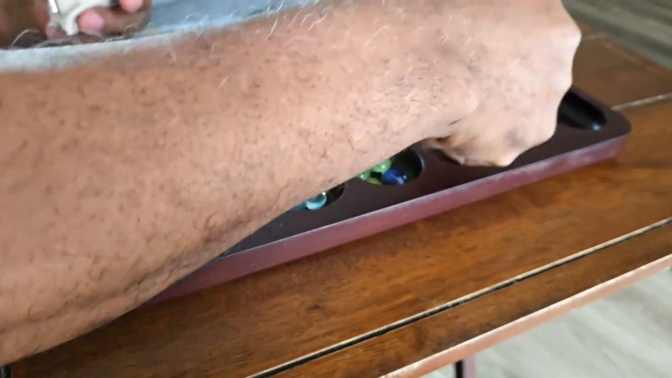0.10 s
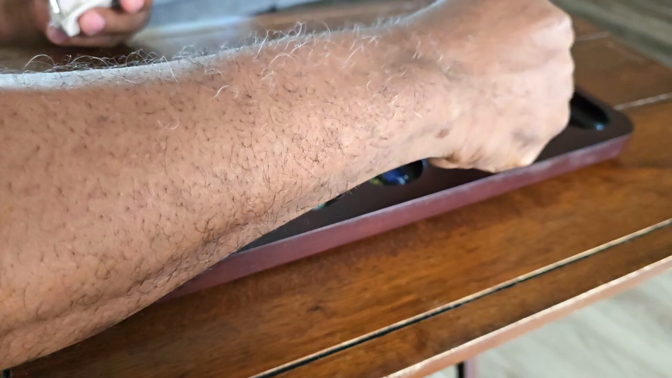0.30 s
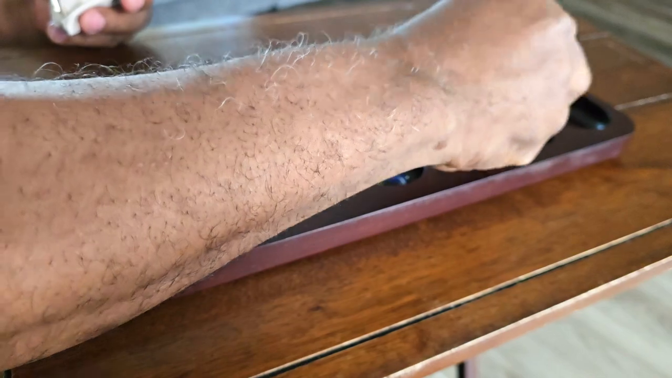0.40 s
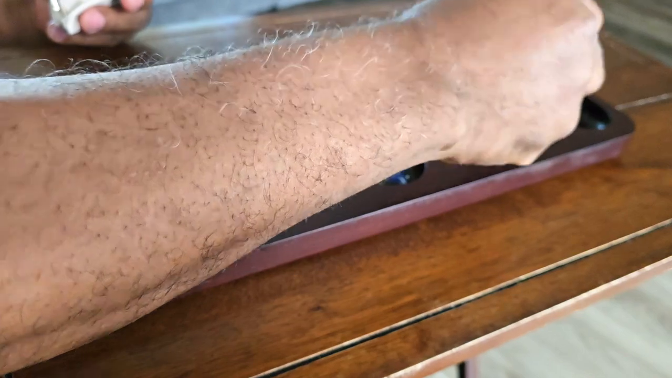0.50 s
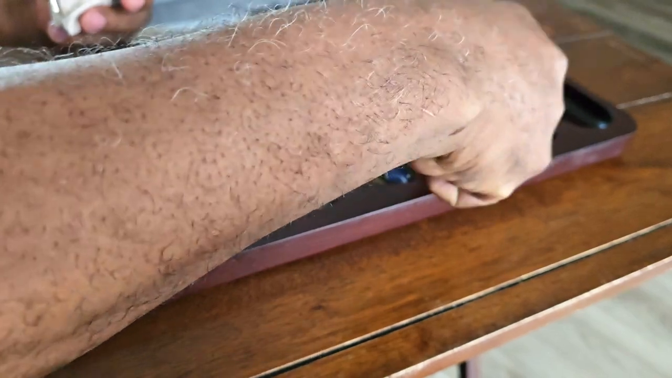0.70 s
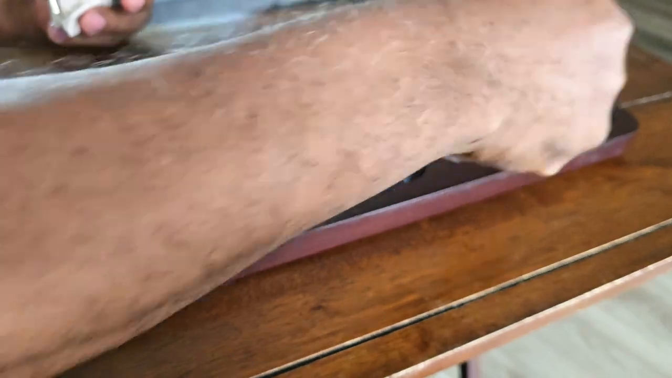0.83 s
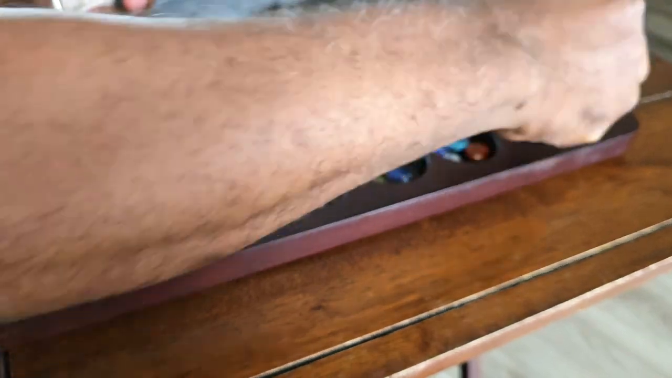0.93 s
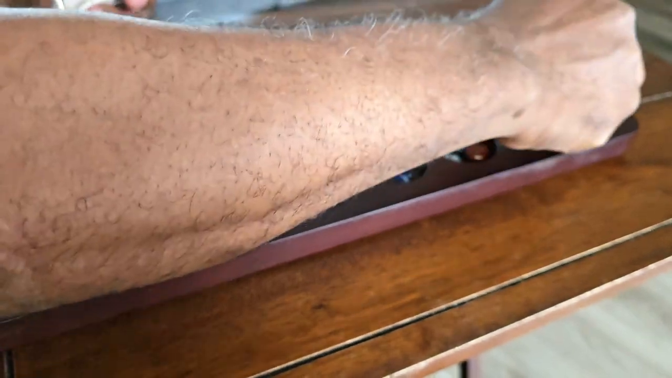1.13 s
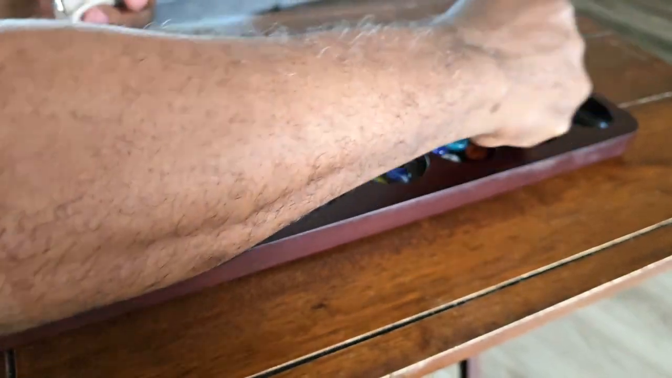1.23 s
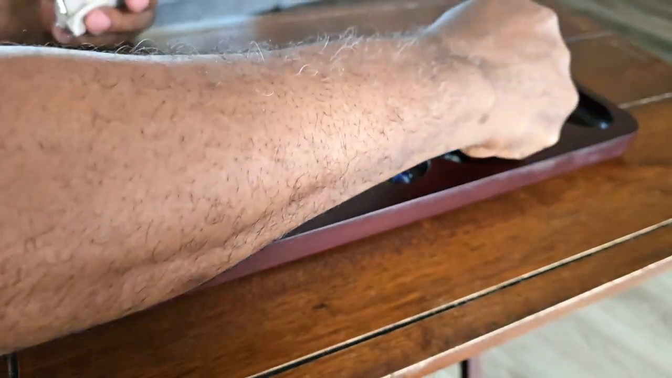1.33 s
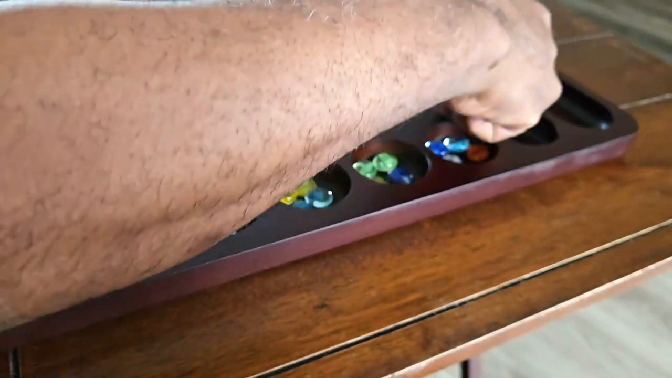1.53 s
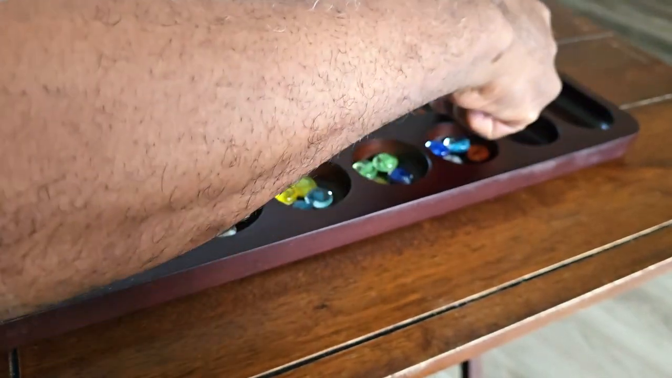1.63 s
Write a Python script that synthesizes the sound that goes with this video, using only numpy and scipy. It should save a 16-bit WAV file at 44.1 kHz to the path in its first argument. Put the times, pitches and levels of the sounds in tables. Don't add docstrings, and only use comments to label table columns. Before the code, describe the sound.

Glass stones drop by hand into a hollow wooden game board: a dense clicking rattle, a near-quiet pause with faint nudges, then more sharp drops that bounce and settle, heard close in a small quiet room.

```python
import sys
import numpy as np
from scipy import signal
from scipy.fft import rfft, irfft
from scipy.io import wavfile

SR = 44100
rng = np.random.default_rng(int(sys.argv[2]) if len(sys.argv) > 2 else 0)


def voltage_ratio(decibels):
    exponent = np.asarray(decibels, float) / 20
    return 10 ** exponent


def dump_mix(stems):
    frames = np.atleast_2d(stems).T
    limited = np.clip(frames, -1, 1)
    pcm = np.round(limited * 32767).astype(np.int16)
    wavfile.write(sys.argv[1], SR, pcm)


N = 74970


def in_time(rows):
    s, *columns = np.transpose(rows)
    return [np.interp(np.arange(N) / SR, s, column) for column in columns]


def drift(rate_hz):
    knots = rng.standard_normal(int(rate_hz * N / SR) + 2)
    return np.interp(np.arange(N) * rate_hz / SR, np.arange(len(knots)), knots)


def butter(x, order, hz, kind):
    return signal.sosfilt(signal.butter(order, hz, kind, fs=SR, output="sos"), x)


def cut(x, hz, kind):
    return butter(x, 2, hz, kind)


APART_HZ = 1230
MODE_SCATTER_DB, EAR_SCATTER_DB = 3.0, 3.0


def strike(s, db, modes):
    out = np.zeros((2, N))
    at = (np.asarray(s) * SR).astype(int)
    draws = rng.standard_normal((len(at), len(modes), 2))
    for k, (hz, level_db, t60) in enumerate(modes):
        shared_db = MODE_SCATTER_DB * draws[:, k, 0]
        apart_db = EAR_SCATTER_DB * min(hz / APART_HZ / 2, 1) * draws[:, k, 1]
        clicks = np.full((2, N), 1e-18)
        polarity = (-1) ** k
        clicks[:, at] = voltage_ratio(db + level_db + shared_db + apart_db * [[.5], [-.5]]) * polarity
        radius = voltage_ratio(-60 / (t60 * SR))
        angle = 2 * np.pi * hz / SR
        resonator = [1, -2 * radius * np.cos(angle), radius * radius]
        out += signal.lfilter([0, np.sin(angle)], resonator, clicks)
    return out


# (frequency [Hz], level [dB], t60 [s])
BOARD_MODES = [(260.3, -44, 0.051), (370, -44, 0.066), (470, -48.5, 0.028), (718, -42, 0.094),
               (900, -40, 0.031), (1210, -37.5, 0.042)]
PIT_LOW_HZ, WOOD_TOP_HZ = 650, 5600
GLASS_LOW_HZ, EDGE_HZ = 3500, 11500
STONE_SCATTER, LONGEST_GLASS_RING_S = .081, .006


def touches(rows, wood, glass, board_db=0):
    s, wood_db, *glass_db = np.transpose(rows)
    knock = cut(strike(s, wood_db, wood), PIT_LOW_HZ, "high")
    knock += strike(s, wood_db + board_db, BOARD_MODES)
    body_modes, edge_modes = [], []
    for hz, db, t60 in glass:
        stone_hz = hz * (1 + STONE_SCATTER * rng.uniform(-0.59, 1))
        mode = (stone_hz, db, min(t60, LONGEST_GLASS_RING_S))
        (body_modes if hz < EDGE_HZ else edge_modes).append(mode)
    body = cut(strike(s, glass_db[0], body_modes), EDGE_HZ, "low")
    edge = cut(strike(s, glass_db[-1], edge_modes), EDGE_HZ, "high")
    return cut(knock, WOOD_TOP_HZ, "low") + cut(body, GLASS_LOW_HZ, "high") + edge


# (frequency [Hz], density [dB per Hz])
HUM_SPECTRUM = [(40, 6), (150, -11.5), (330, -17.5), (520, -4.5), (900, -19.5), (1400, -20.5), (3200, -37),
                (16000, -33.5)]
# (frequency [Hz], rms level [dB])
APPLIANCE_TONES = [(888, -82), (3220, -92)]
HUM_DB, GATE_OPEN_DB, GATE_HZ = -70.5, 14, 750


def hum(gate):
    hz = np.arange(N // 2 + 1) * SR / N + 1
    white = rng.standard_normal((3, N))
    spectrum_hz, spectrum_db = np.transpose(HUM_SPECTRUM)
    shape = voltage_ratio(np.interp(np.log(hz), np.log(spectrum_hz), spectrum_db))
    noise = irfft(rfft(white[0] + 0.093 * white[1:]) * shape, N)
    upper = butter(noise, 1, GATE_HZ, "high")
    opened = noise + upper * (voltage_ratio(GATE_OPEN_DB * gate) - 1)
    out = voltage_ratio(HUM_DB + 3.8 * drift(30.32)) * opened / noise.std()
    for tone_hz, db in APPLIANCE_TONES:
        level = np.sqrt(2) * voltage_ratio(db + 2 * drift(11))
        out += level * np.sin(2 * np.pi * np.cumsum(tone_hz + 11.0 * drift(27)) / SR)
    return out


# (time [s], wood level [dB], glass level [dB])
FINGER_TICKS = [
    (.0548, -80, -41),
    (.0675, -76, -49),
    (.0729, -74, -38),
    (.103, -74, -41),
    (.1062, -59, -60),
]
# (frequency [Hz], level [dB], t60 [s])
HAND_GLASS = [(9700, -0.5, 0.0016), (10500, -11, 0.0015), (13200, -0.5, 0.0029), (15200, -32, .004)]


def finger_ticks():
    return touches(FINGER_TICKS, NEAR_WOOD, HAND_GLASS)


# (time [s], level [dB])
KNOCKS = [
    (.171, -41),
    (0.849, -39.5),
]
# (frequency [Hz], level [dB], t60 [s])
TABLE_MODES = [(397, -15, 0.047), (505, -6, 0.025), (1023.4, -20, .015)]


def knuckle_knocks():
    return strike(*np.transpose(KNOCKS), TABLE_MODES)


# (frequency [Hz], level [dB], t60 [s])
NEAR_WOOD = [(1472, -26, 0.017), (2040, -16, 0.012), (2353, -10, 0.0057), (2986, -4.5, 0.0028),
             (4010, -6, 0.005), (4790, -8, 0.0017)]
# (frequency [Hz], level [dB], t60 [s])
NEAR_GLASS = [(6800, -5.5, 0.0056), (7780, -7, 0.01), (8930, -5, 0.0024), (9720, -4.5, 0.024),
              (10700, 2, 0.0012), (12370, -5, 0.0051), (13250, -17, 0.011), (15300, -4.5, 0.003)]


def near_pit(rows):
    return touches(rows, NEAR_WOOD, NEAR_GLASS)


# (time [s], wood level [dB], glass level [dB], glass edge level [dB])
FIRST_DROPS = [(0.2072, -11.0, -8.0, -5.0), (0.2141, -27.0, -17.0, -15.0), (0.2206, -29.0, -19.0, -25.0),
               (0.2511, -8.0, -8.0, -3.0), (0.2839, -16.0, -16.0, -27.0), (0.3008, -30.0, -35.0, -38.0),
               (0.3031, -25.0, -27.0, -33.0), (0.3094, -22.0, -18.0, -6.0), (0.3179, -22.0, -20.0, -21.0),
               (0.3318, -26.0, -20.0, -11.0), (0.3392, -25.0, -20.0, -11.0), (0.3433, -34.0, -25.0, -26.0),
               (0.3491, -27.0, -26.0, -27.0), (0.359, -28.0, -22.0, -15.0), (0.3634, -35.0, -27.0, -38.0),
               (0.3723, -37.0, -31.0, -36.0), (0.3808, -38.0, -31.0, -24.0), (0.3837, -39.0, -31.0, -39.0),
               (0.3905, -22.0, -15.0, -13.0), (0.3938, -11.0, -7.0, -5.0), (0.4033, -16.0, -15.0, -14.0),
               (0.413, -5.0, -3.0, -11.0), (0.4261, -27.0, -21.0, -18.0), (0.4388, -4.0, 1.0, -5.0),
               (0.4467, -18.0, -16.0, -20.0), (0.4674, -11.0, -9.0, -10.0), (0.4728, -20.0, -19.0, -21.0),
               (0.4856, -12.0, -7.0, -11.0), (0.4896, -22.0, -13.0, -10.0), (0.499, -22.0, -20.0, -22.0),
               (0.5078, -16.0, -16.0, -22.0), (0.5151, -20.0, -17.0, -18.0), (0.5207, -20.0, -19.0, -29.0),
               (0.5234, -23.0, -21.0, -30.0), (0.5276, -27.0, -28.0, -29.0), (0.5368, -26.0, -24.0, -38.0),
               (0.5425, -22.0, -21.0, -23.0), (0.5451, -12.0, -11.0, -10.0), (0.552, -25.0, -29.0, -29.0),
               (0.5687, -33.0, -31.0, -48.0), (0.5746, -18.0, -18.0, -21.0), (0.5891, -35.0, -33.0, -49.0),
               (0.5961, -20.0, -19.0, -24.0), (0.6101, -25.0, -28.0, -29.0), (0.6192, -26.0, -27.0, -35.0),
               (0.6261, -28.0, -32.0, -41.0), (0.6314, -34.0, -37.0, -51.0), (0.6463, -40.0, -47.0, -61.0)]
# (time [s], wood level [dB], glass level [dB], glass edge level [dB])
NUDGES = [(0.7622, -45.0, -63.0, -71.0), (0.7692, -40.0, -49.0, -58.0), (0.7722, -29.0, -26.0, -40.0),
          (0.7907, -33.0, -39.0, -53.0), (0.7949, -37.0, -44.0, -45.0), (0.8082, -44.0, -44.0, -61.0),
          (0.822, -43.0, -44.0, -60.0), (0.8313, -29.0, -24.0, -23.0), (0.8475, -32.0, -30.0, -44.0),
          (0.8607, -34.0, -44.0, -55.0), (0.8653, -37.0, -37.0, -53.0), (0.8698, -41.0, -35.0, -49.0)]


def near_drops(spot):
    return near_pit((FIRST_DROPS + NUDGES)[spot::3])


# (time [s], level [dB])
ROCKING = [(.2, -120), (.22, -29), (.38, -47), (.55, -53), (.64, -50), (.7, -87), (.77, -61.5),
           (.88, -52.5), (.95, -102), (1.02, -53.5), (1.04, -29.5), (1.27, -50), (1.3, -34), (1.43, -52),
           (1.5, -109), (1.56, -73), (1.6, -34), (1.7, -95)]
ROCKS_PER_S, ROCK_SPREAD_DB, ROCK_GLASS_DB, ROCK_EDGE_DB = 420, 1.5, 0.5, -12


def rocking():
    effort_db, = in_time(ROCKING)
    sizes, chance = rng.exponential(1, N), rng.random(N)
    at = np.flatnonzero(chance < ROCKS_PER_S / SR)
    db = effort_db[at] + ROCK_SPREAD_DB * (np.minimum(sizes[at], 3) - 1)
    rows = np.transpose([(at + .5) / SR, db, db + ROCK_GLASS_DB, db + ROCK_EDGE_DB])
    near = rows[:, 0] < 1
    return near_pit(rows[near]) + far_pit(rows[~near])


# (time [s], level [dB])
ROLL = [
    (.24, -103),
    (.29, -57),
    (.37, -66),
    (.42, -60),
    (.48, -73),
    (.55, -64),
    (.63, -57.5),
    (.69, -76),
]


def rolling():
    db, = in_time(ROLL)
    on = (db != db[0]) & (db != db[-1])
    level = on * np.sqrt(2) * voltage_ratio(db + 0.83 * drift(26))
    roll_hz = 318.8 + 3 * drift(25)
    return level * np.sin(2 * np.pi * np.cumsum(roll_hz) / SR)


# (frequency [Hz], level [dB], t60 [s])
FAR_WOOD = [(2090, -33, 0.0053), (2602, -17, 0.011), (3225, -7, 0.0052), (4010, -7, 0.0036),
            (4340, -9, 0.009), (4580, -7, 0.0014)]
# (frequency [Hz], level [dB], t60 [s])
FAR_BODY = [(820, -46.5, 0.01), (1500, -40.5, 0.013), (2010, -26.5, 0.0035)]
# (frequency [Hz], level [dB], t60 [s])
FAR_GLASS = [(6600, -2, 0.0014), (7740, -7.5, 0.0085), (8060, -6, 0.0063), (10420, -0.5, 0.0019),
             (11900, -9.5, 0.0061), (12780, -7.5, 0.0031), (14670, 0.5, 0.0029), (15800, -19.5, 0.0086)]


def far_pit(rows):
    return touches(rows, FAR_WOOD + FAR_BODY, FAR_GLASS, board_db=-4)


# (time [s], wood level [dB], glass level [dB], glass edge
# level [dB])
FAR_DROPS = [(1.0233, -9.0, -2.0, -8.0), (1.0537, -20.0, -26.0, -33.0), (1.0652, -12.0, -14.0, -13.0),
             (1.0761, -17.0, -23.0, -34.0), (1.0872, -15.0, -23.0, -28.0), (1.0928, -17.0, -22.0, -27.0),
             (1.098, -25.0, -27.0, -26.0), (1.1044, -28.0, -33.0, -29.0), (1.1102, -26.0, -33.0, -31.0),
             (1.1136, -25.0, -33.0, -36.0), (1.1182, -21.0, -26.0, -35.0), (1.1211, -29.0, -37.0, -44.0),
             (1.1267, -32.0, -41.0, -44.0), (1.1433, -26.0, -35.0, -42.0), (1.1457, -30.0, -41.0, -47.0),
             (1.1685, -29.0, -36.0, -49.0), (1.1797, -34.0, -42.0, -49.0), (1.1824, -38.0, -47.0, -51.0),
             (1.1923, -23.0, -31.0, -32.0), (1.2078, -40.0, -51.0, -51.0), (1.2148, -27.0, -29.0, -29.0),
             (1.2193, -30.0, -31.0, -35.0), (1.2228, -32.0, -35.0, -38.0), (1.2256, -29.0, -37.0, -38.0),
             (1.2383, -23.0, -37.0, -42.0), (1.2436, -37.0, -33.0, -40.0), (1.2478, -34.0, -35.0, -41.0),
             (1.2516, -36.0, -35.0, -39.0), (1.2561, -26.0, -29.0, -37.0), (1.2627, -25.0, -36.0, -47.0),
             (1.289, -2.0, -11.0, -14.0), (1.3031, -21.0, -29.0, -32.0), (1.3074, -15.0, -21.0, -37.0),
              (1.3217, -7.0, -15.0, -8.0), (1.3356, -12.0, -18.0, -14.0), (1.3454, -27.0, -27.0, -32.0),
              (1.3576, -30.0, -35.0, -45.0), (1.3846, -18.0, -29.0, -22.0), (1.3922, -29.0, -42.0, -45.0),
              (1.3986, -30.0, -33.0, -45.0), (1.4029, -28.0, -35.0, -44.0), (1.4061, -27.0, -36.0, -49.0),
              (1.4092, -30.0, -35.0, -46.0), (1.4158, -29.0, -38.0, -51.0), (1.4186, -33.0, -40.0, -49.0),
              (1.4642, -36.0, -59.0, -38.0), (1.5115, -50.0, -74.0, -57.0), (1.5226, -49.0, -81.0, -75.0),
              (1.5288, -64.0, -85.0, -76.0), (1.5344, -64.0, -84.0, -79.0), (1.5491, -40.0, -83.0, -63.0),
              (1.5587, -42.0, -80.0, -65.0), (1.5697, -32.0, -46.0, -55.0), (1.5752, -24.0, -18.0, -14.0),
              (1.5881, -32.0, -27.0, -19.0), (1.5956, -38.0, -29.0, -29.0), (1.608, -30.0, -36.0, -30.0),
              (1.6706, -44.0, -67.0, -65.0), (1.6759, -45.0, -63.0, -66.0), (1.6936, -54.0, -73.0, -68.0)]


def far_drops(spot):
    return far_pit((FAR_DROPS)[spot::3])


# (time [s], level [dB])
SETTLES = [
    (1.5754, -38.5),
    (1.607, -36.5),
]
# (frequency [Hz], level [dB], t60 [s])
PIT_FLOOR = [(933, -14.5, 0.026), (1343, -11.5, 0.015)]


def settling():
    return strike(*np.transpose(SETTLES), PIT_FLOOR)


EARLY_DB, EARLY_T60_S, EARLY_GAP_S = -31.5, 0.037, 0.0013
ROOM_DB, ROOM_T60_S, ROOM_CUT_HZ, ROOM_SIDE_DB = -34, 0.2, 9000, 2
LOW_ROOM_DB, LOW_ROOM_T60_S, LOW_ROOM_HZ = -44.5, 0.75, 1485


def room(x):
    t = np.arange(SR // 2) / SR
    middle, side = rng.standard_normal((2, len(t)))
    noise = middle + voltage_ratio(ROOM_SIDE_DB) * cut(side, APART_HZ, "high") * [[1], [-1]]
    early = noise * voltage_ratio(EARLY_DB - 60 * t / EARLY_T60_S)
    late = butter(noise, 1, ROOM_CUT_HZ, "low") * voltage_ratio(ROOM_DB - 60 * t / ROOM_T60_S)
    low = butter(noise, 2, LOW_ROOM_HZ, "low") * voltage_ratio(LOW_ROOM_DB - 60 * t / LOW_ROOM_T60_S)
    onset = np.clip(t / EARLY_GAP_S - .3, 0, 1)
    return signal.fftconvolve(x, (early + late + low) * onset, axes=1)[:, :N]


def noise_gate(x):
    knee_db, release_s = -60.5, 0.016
    keep = np.exp(-1 / (release_s * SR))
    power = signal.lfilter([1 - keep], [1, -keep], np.mean(x ** 2, axis=0))
    return power / (power + voltage_ratio(2 * knee_db))


def delay(x, lag_s):
    phase = np.exp(-2j * np.pi * lag_s * SR * np.arange(N // 2 + 1) / N)
    return irfft(rfft(x) * phase, N)


def scene():
    spots = [near_drops(k) + far_drops(k) for k in range(3)]
    spots.append(finger_ticks() + knuckle_knocks() + rocking() + settling())
    direct = sum(spots)
    echoes = sum(room(x) for x in spots)
    direct[0] = delay(direct[0], .000016)
    stones = direct + echoes
    gate = noise_gate(stones)
    board_low_hz = 230
    stones = cut(cut(stones, board_low_hz, "high"), board_low_hz, "high")
    return stones + rolling() + hum(gate)


def band_limit(x):
    return signal.sosfilt(signal.butter(12, 16640, fs=SR, output="sos"), x)


def record(dry):
    x = cut(np.tanh(dry), 170, "high")
    x = signal.sosfilt(signal.cheby2(8, 40, 16400, fs=SR, output="sos"), x)
    return band_limit(x)


dry = scene()
out = record(dry)
dump_mix(out)
```